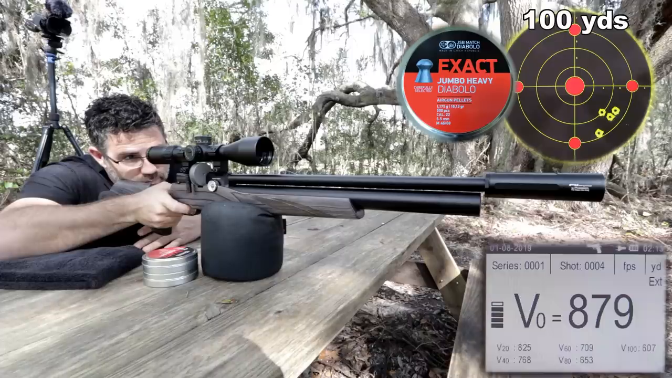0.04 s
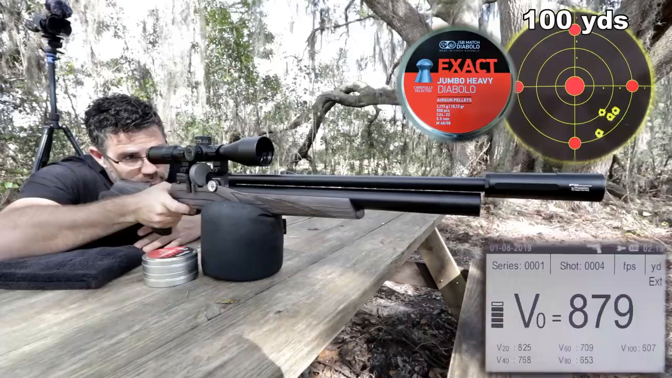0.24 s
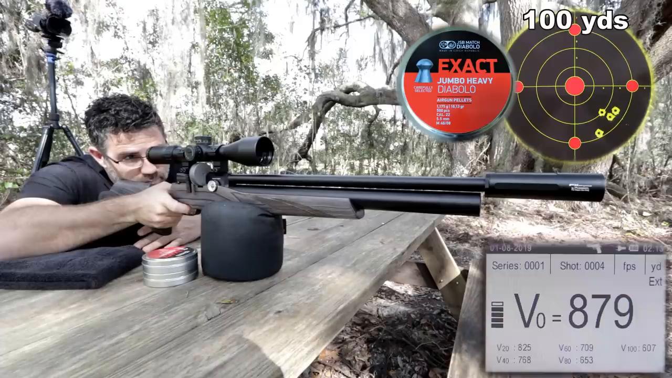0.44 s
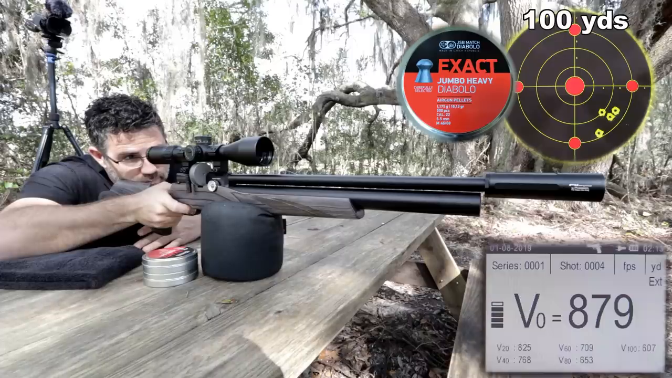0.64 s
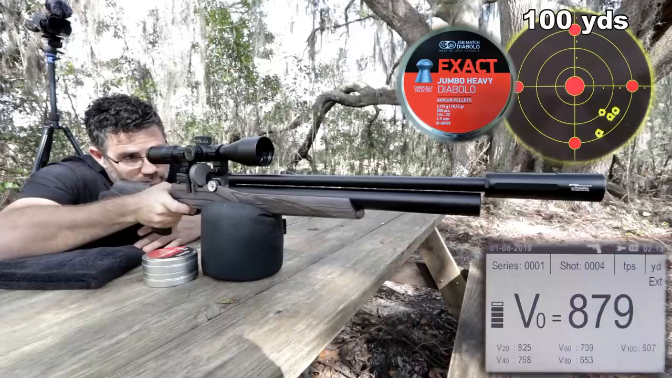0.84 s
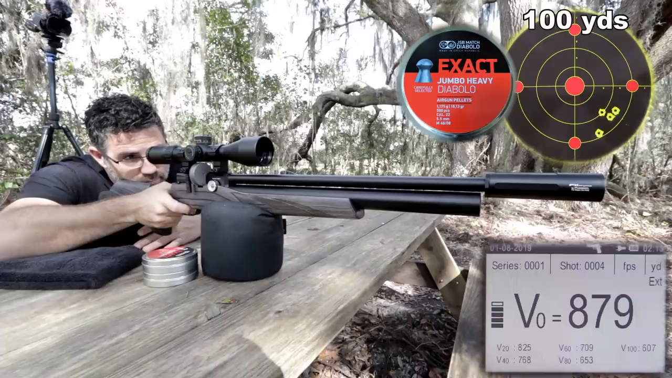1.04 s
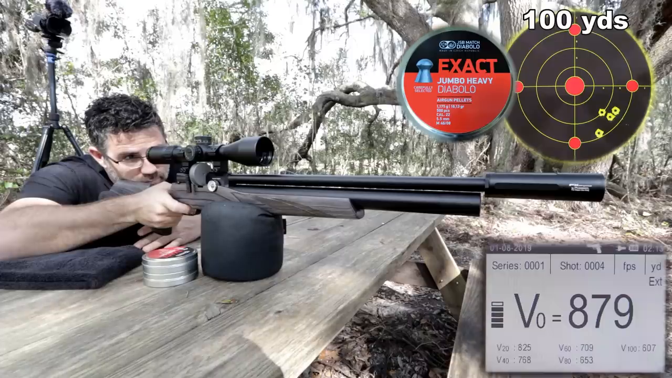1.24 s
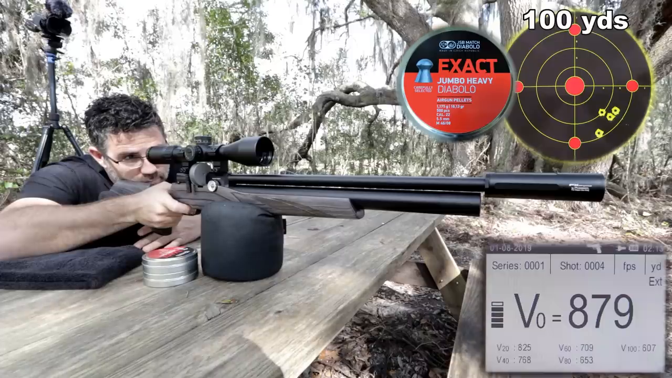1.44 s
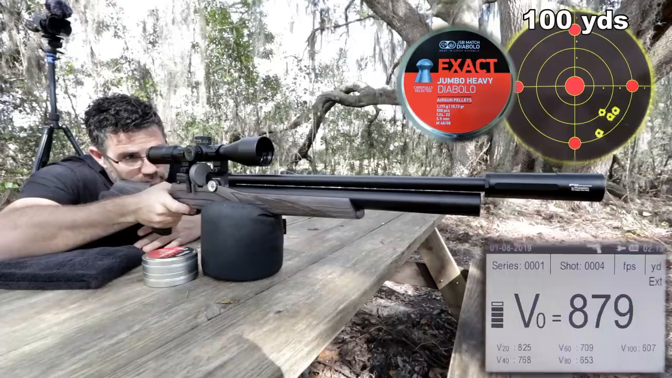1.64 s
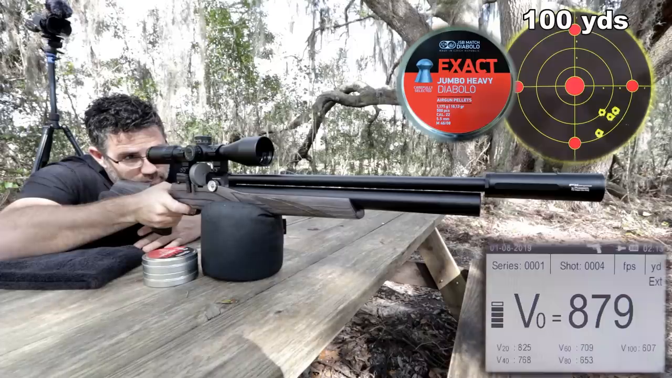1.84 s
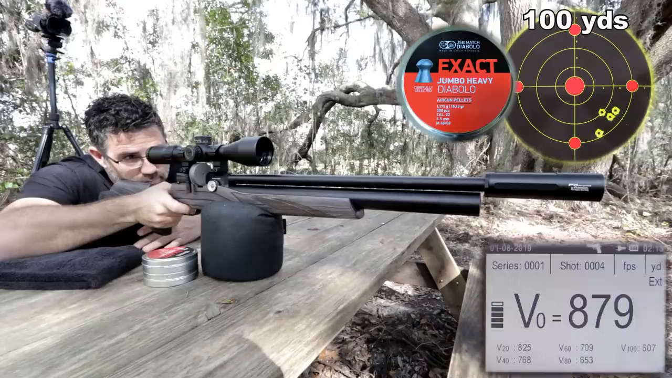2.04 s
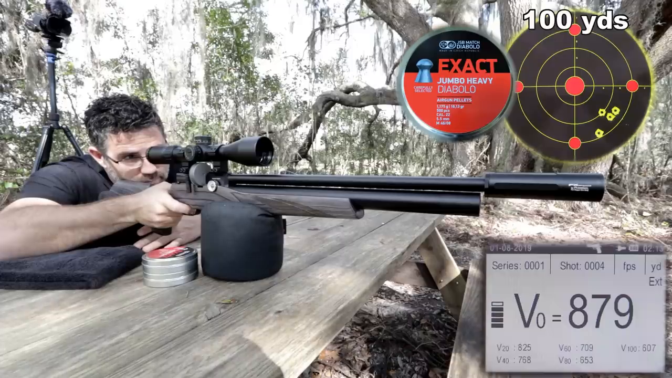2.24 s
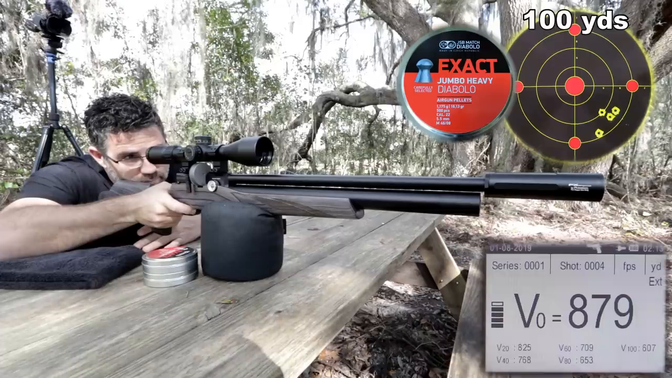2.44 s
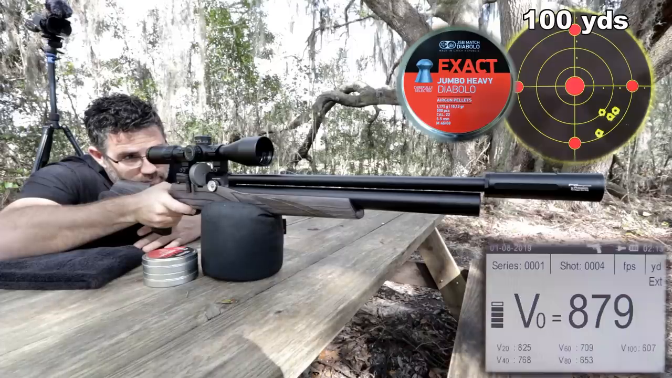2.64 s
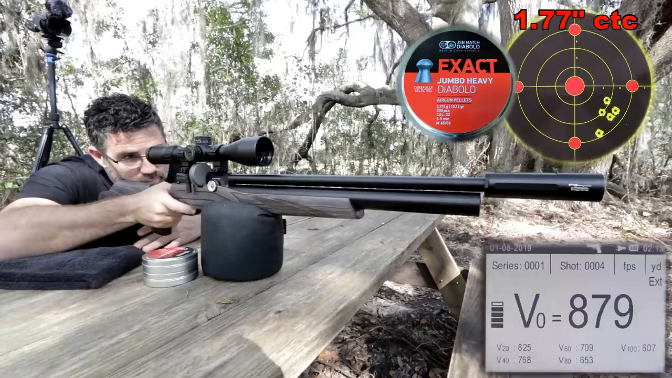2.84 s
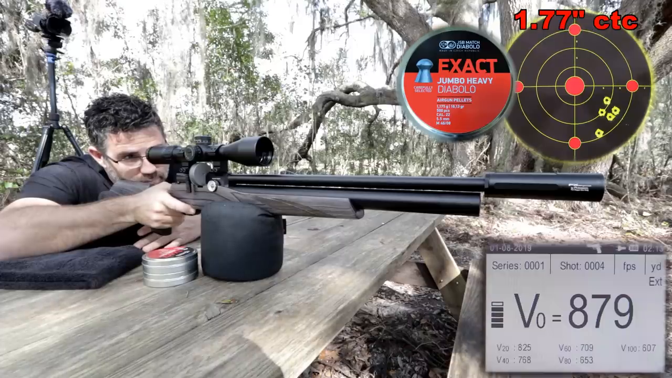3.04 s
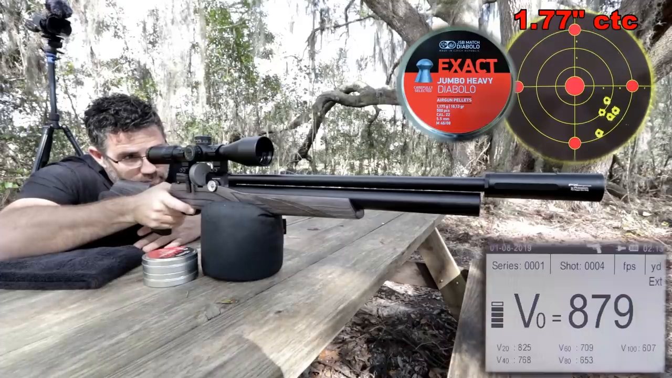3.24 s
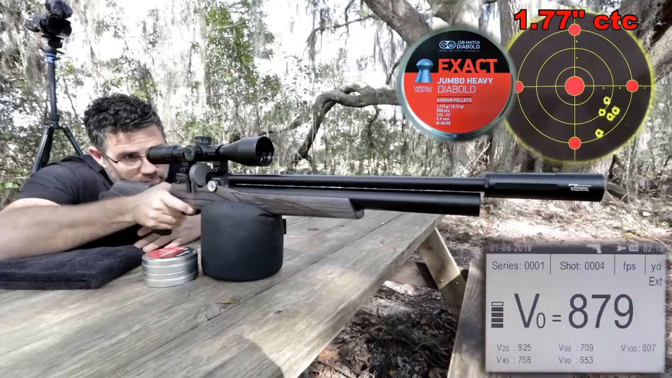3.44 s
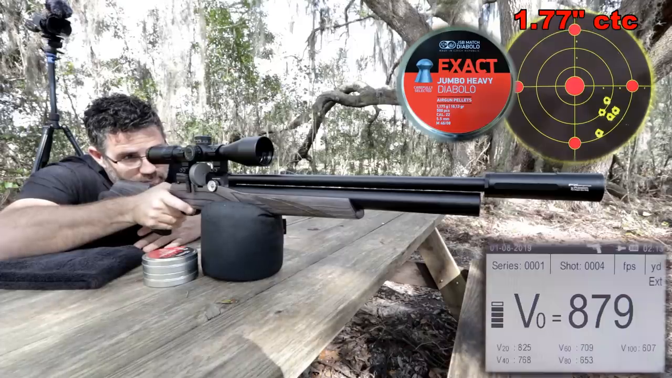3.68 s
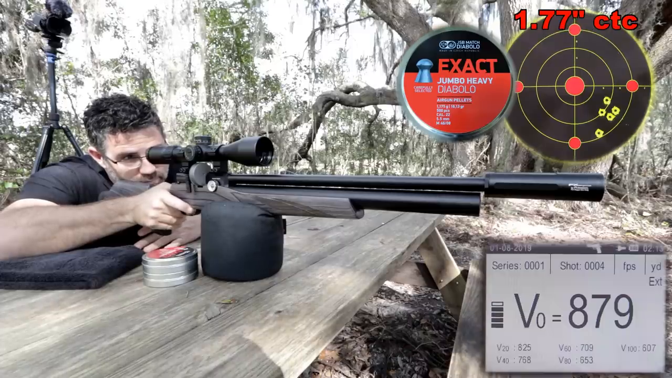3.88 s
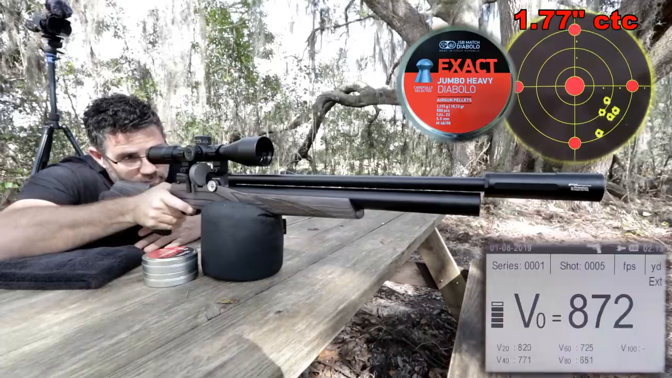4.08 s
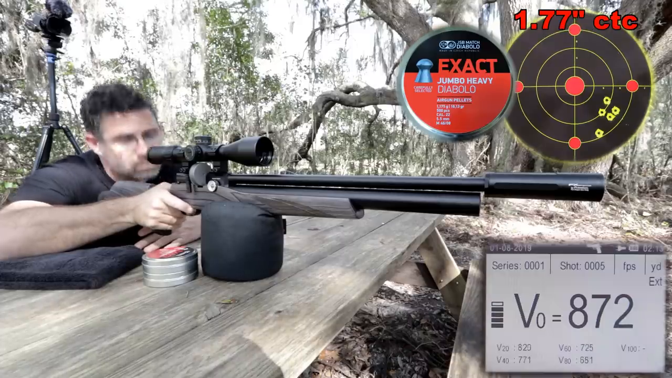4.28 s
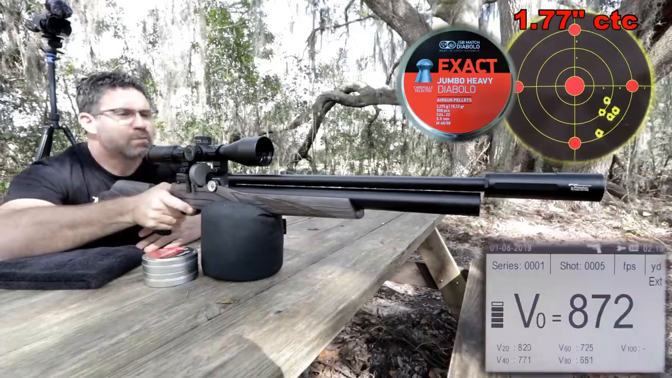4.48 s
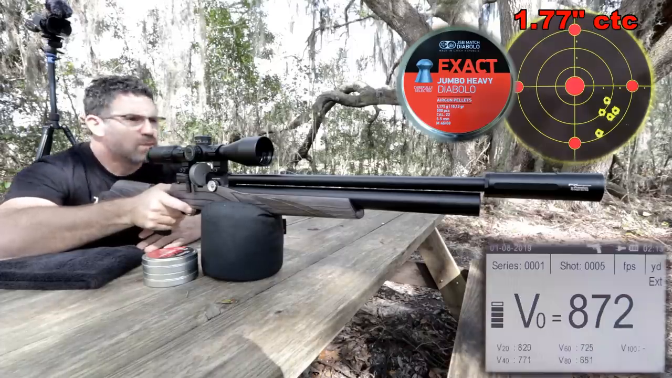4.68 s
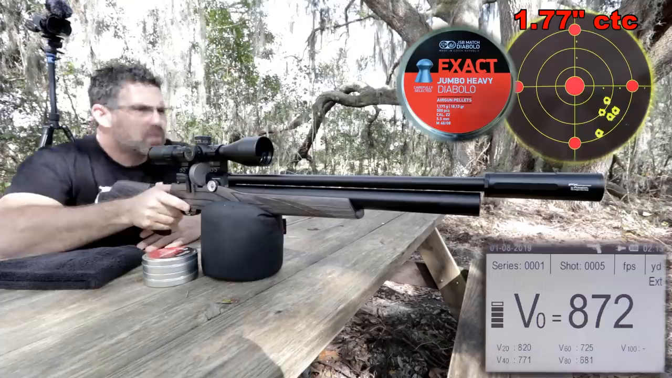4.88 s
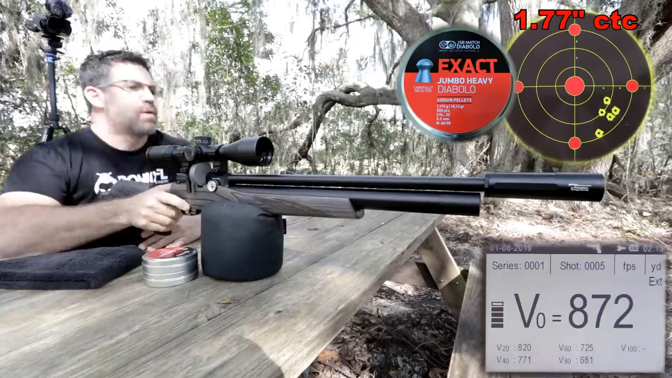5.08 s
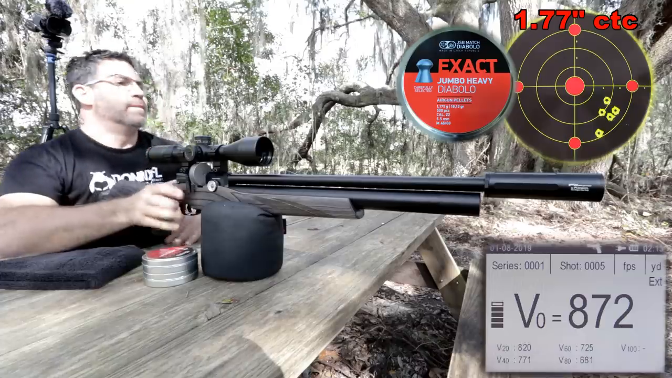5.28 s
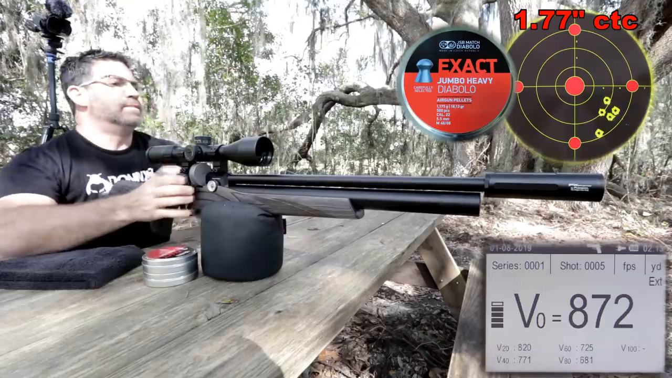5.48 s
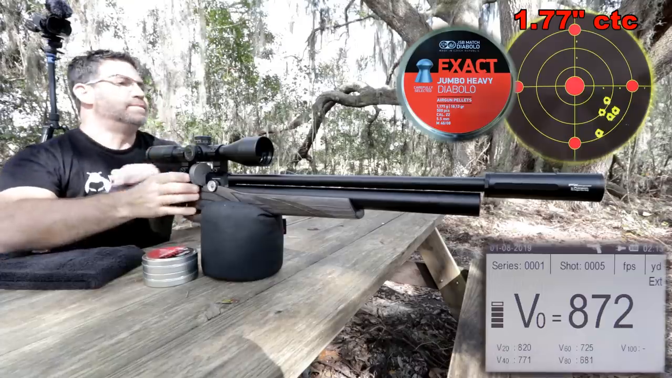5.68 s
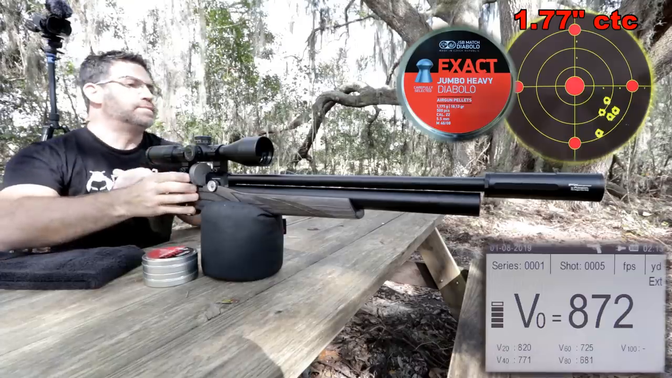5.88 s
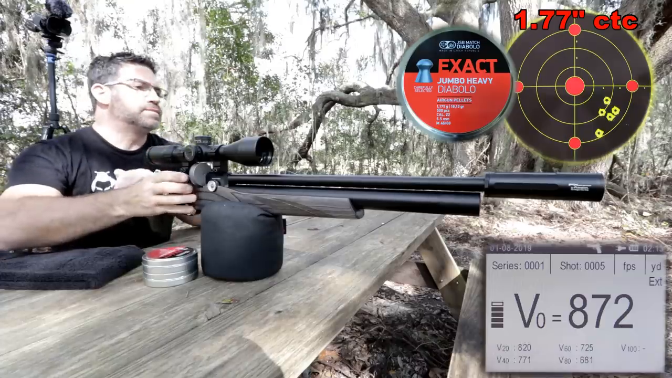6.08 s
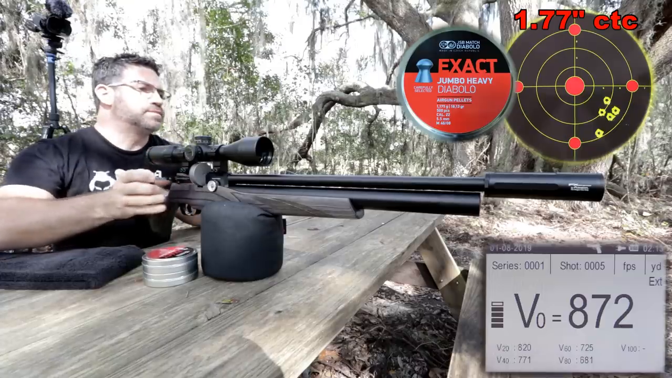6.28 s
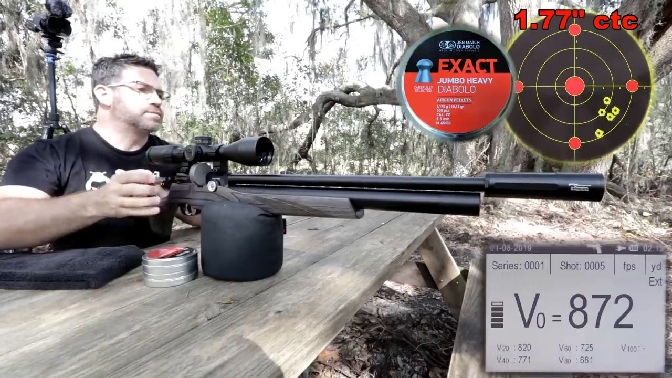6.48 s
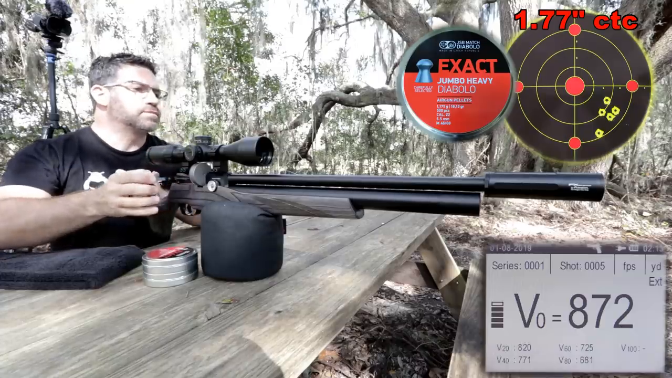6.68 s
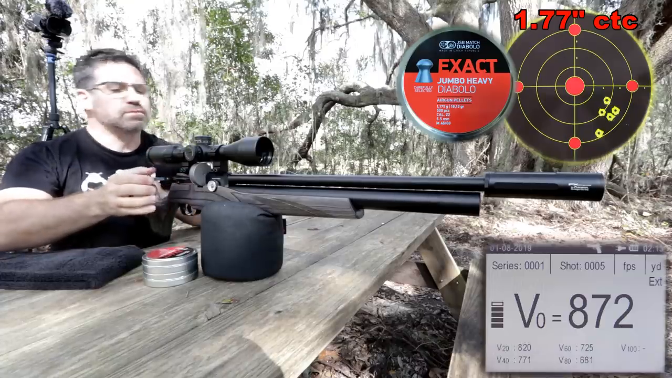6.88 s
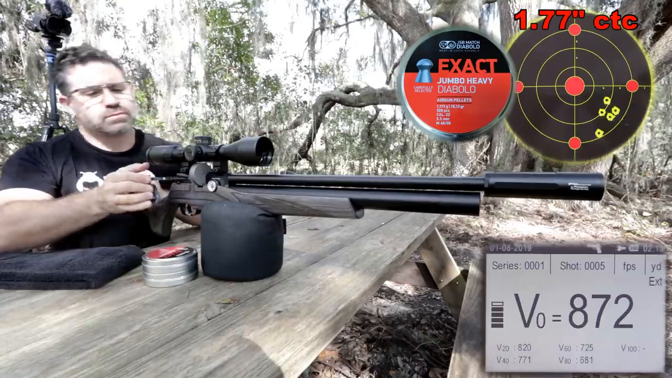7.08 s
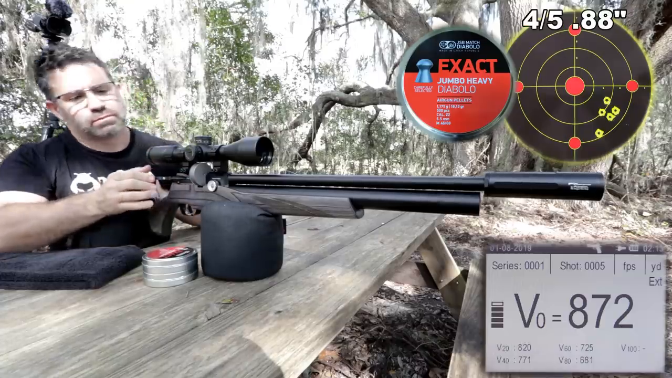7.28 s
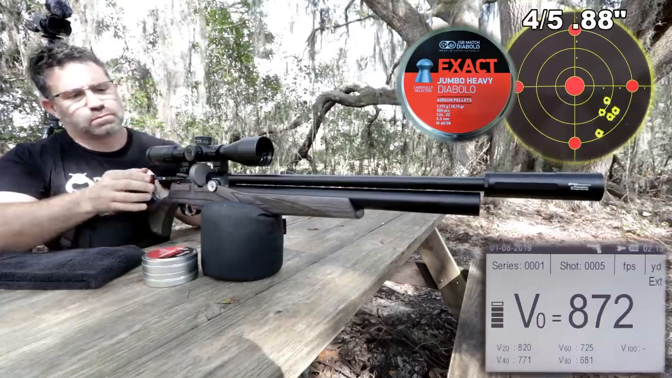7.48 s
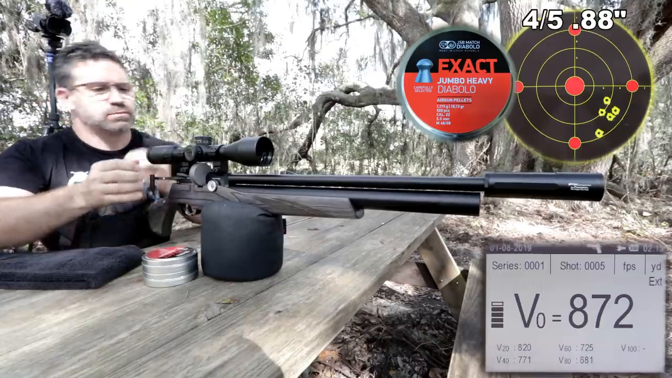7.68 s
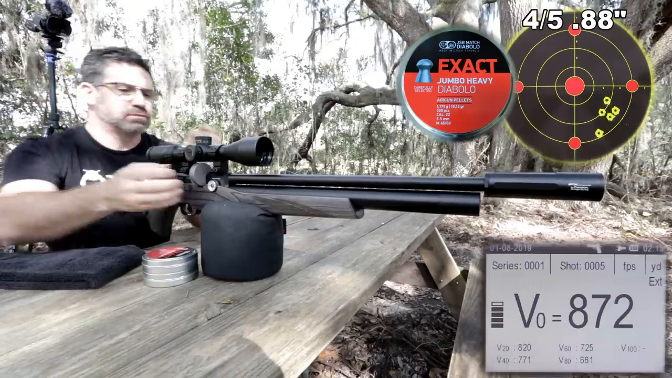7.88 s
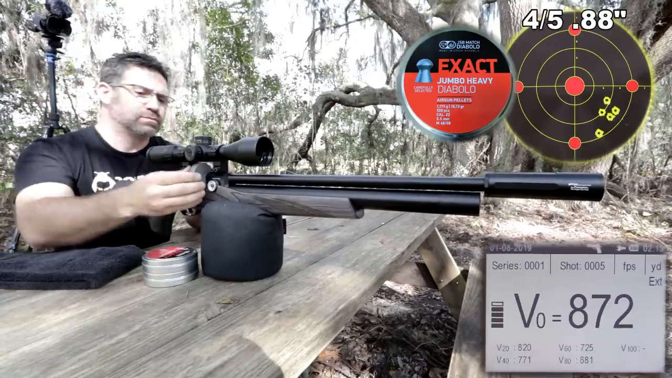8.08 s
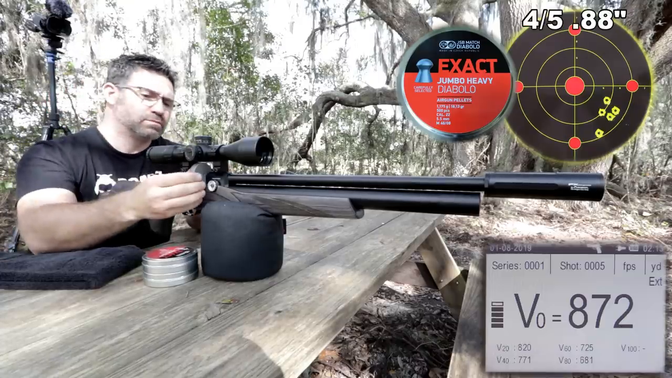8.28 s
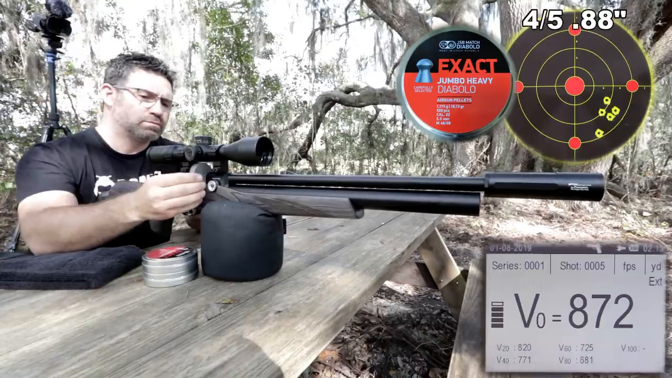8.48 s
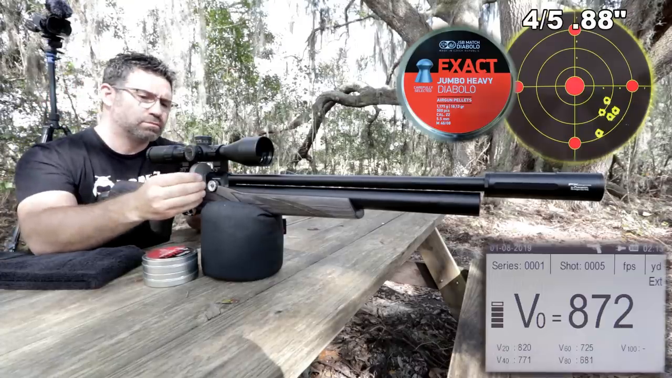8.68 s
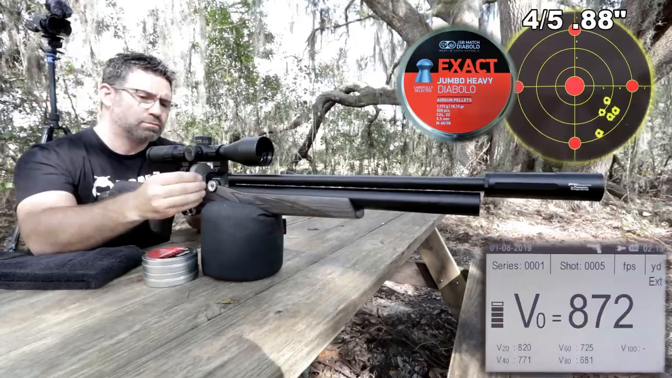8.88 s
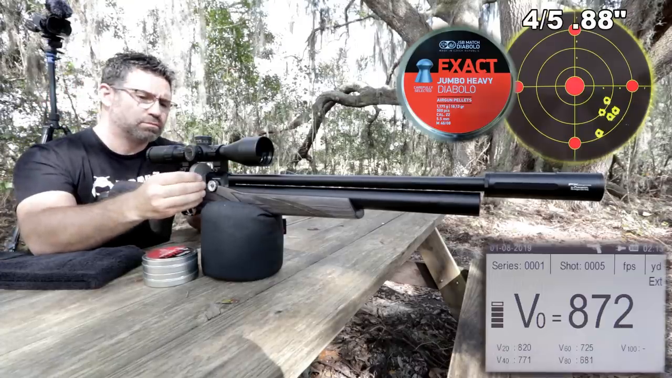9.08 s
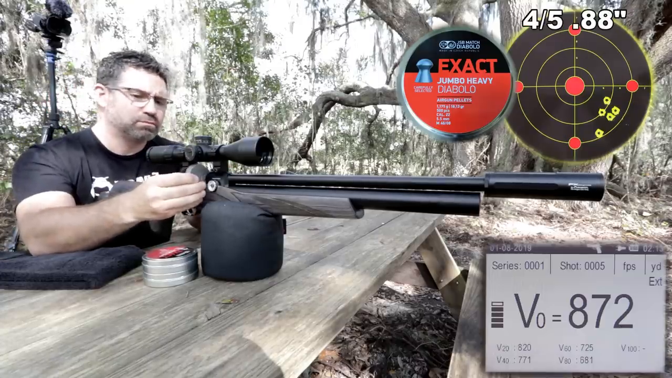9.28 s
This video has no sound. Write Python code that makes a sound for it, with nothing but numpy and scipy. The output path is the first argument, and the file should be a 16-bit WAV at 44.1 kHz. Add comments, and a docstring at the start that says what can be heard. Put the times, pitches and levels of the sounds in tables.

```python
"""A faint engine hum, insect chorus, breeze and the last of a katydid phrase open a scene in the woods.
Far hawks scream and yelp: gliding partials; the katydid is trains of falling whistles. An air rifle fires
from a bench: struck modes for steel and chambers, noise bursts for air. About 0.7 s later, from beside the
target, the pellet hisses in, smacks the board and scatters chips. The shooter sits up with soft rubs of
filtered noise and works the side lever. Random small echoes make the trees."""
import sys
import numpy as np
from scipy import signal
from scipy.fft import irfft, next_fast_len
from scipy.io import wavfile

SR = 44100
rng = np.random.default_rng(int(sys.argv[2]) if len(sys.argv) > 2 else 0)


def waveform_to_disk(signal):
    """Save audio, clipped to [-1, 1], as 16-bit WAV at the path in sys.argv[1]."""
    frames = np.transpose(np.atleast_2d(signal))
    scaled = np.clip(frames, -1, 1) * 32767
    samples = np.round(scaled).astype(np.int16)
    wavfile.write(sys.argv[1], SR, samples)


N = 411453
TIME = np.arange(N) / SR
EDGE_HZ = 15800  # top of the band

# Spectra give only a colour: each noise is brought to one loudness, then placed in the mix.
# still air: (frequency [Hz], relative level [dB])
AIR_COLOUR = [(20, -22), (35, -12), (65, -6), (110, -7), (200, -13), (400, -15.5), (1000, -22.5),
              (2500, -26), (5000, -31.5), (11000, -35), (15500, -36.5)]
# distant insects: (frequency [Hz], relative level [dB])
CHORUS_COLOUR = [(4500, -42.5), (6000, -18.5), (7000, -12), (7600, -3.5), (8250, -1), (8800, -8.5),
                 (9500, -16), (11500, -34.5)]
# engine loudness ahead of a 3 dB lift and flutter: (time [s], level [dB])
HUM_LEVEL = [(0.0, -63), (0.68, -58), (1.66, -58), (2.31, -63), (3.53, -62), (4.68, -76), (5.06, -65),
             (5.51, -62), (6.86, -68), (7.61, -59), (8.96, -65), (9.33, -62)]
# engine overtones against the fundamental: (multiple [ratio], relative level [dB])
HUM_OVERTONES = [(2, -17.5), (4, -25), (5, -25)]
# breeze: (frequency [Hz], relative level [dB])
GUST_COLOUR = [(15, -9.5), (35, 0.5), (60, 0), (100, -8), (250, -25), (1000, -60)]
# puffs of breeze: (start [s], length [s], level [dB])
BREEZE_PUFFS = [(.1, 1.05, -65), (1.55, .95, -64), (2.9, .3, -66), (5.5, .15, -64), (5.9, .2, -70),
                (7.5, .1, -71)]
PUFF_RISE_S, PUFF_FALL_S, CALM_DB = .13, .14, -84
# far vehicle: (frequency [Hz], relative level [dB])
TRAFFIC_COLOUR = [(80, -11.5), (150, -7), (172, 1), (200, -10), (370, -9.5), (600, -19), (1500, -35),
                  (5000, -65)]
CAR_NEAREST_S, CAR_PASS_S, CAR_DB = 6.4, .8, -64.5

# scatter from the trees: (frequency [Hz], relative level [dB])
TREES_COLOUR = [(80, -4), (400, -4), (1000, -5.5), (1900, -3), (3000, -3), (6000, -0.5), (9000, 1),
                (15000, -4)]
# how long the scatter lasts: (frequency [Hz], t60 [s])
TREES_T60 = [(80, .45), (400, .33), (2000, .36), (6000, .36), (10000, 0.25), (15000, 0.42)]
# trees round the target: (frequency [Hz], relative level [dB])
TARGET_TREES_COLOUR = [(80, -6.5), (350, -7.5), (700, -1), (1500, -3.5), (4000, -10), (8000, -0.5),
                       (15000, -9)]
# echo of the far tree line: (frequency [Hz], relative level [dB])
FAR_TREES_COLOUR = [(900, -20), (1500, -4), (2200, -4), (2550, -3), (2900, -10), (3500, -14), (6000, -22)]

# moments where the katydid's phrases stop: (time [s])
KATYDID_STOPS = [.06, .715, 1.255, 1.77, 2.3, 2.83, 3.425, 4.135, 4.705, 5.23, 5.82, 6.425, 7.0, 7.585,
                 8.125, 8.65, 9.185]
STROKES_PER_S, PHRASE_S, PHRASE_SWELL_S = 72.8, .33, .15

# short bird notes, ahead of a 2.5 dB lift: a two-blip peep, then the low closing notes of two hawk yelps:
# (start [s], length [s], frequency [Hz], level [dB])
SHORT_NOTES = [(5.344, 0.02, 2170, -61), (5.364, 0.019, 2230, -58.5), (8.037, 0.036, 1840, -67.5),
               (8.88, 0.033, 1820, -68)]
# long hawk screams, pitches ahead of the shared gesture:
# (start [s], length [s], top pitch [Hz], closing pitch [Hz], level [dB], late lift [Hz], mid-call sag [dB])
HAWK_SCREAMS = [(.44, .25, 2270, 2140, -85, 0, 3), (1.17, .25, 2500, 2150, -83, 0, 0),
                (1.839, .51, 2774, 2440, -66, 0, -3), (2.633, .3, 2825, 2500, -66.5, 0, 7),
                (3.248, .37, 2950, 2390, -61.5, 170, -1), (3.732, .35, 2940, 2425, -69.5, 0, 0),
                (3.822, .34, 3000, 2467, -63.5, 190, 3.5), (4.296, .25, 3016, 2687, -71, 0, 1),
                (4.358, .3, 3000, 2626, -67.5, 0, -4), (4.866, .29, 3135, 2647, -62, 0, 5),
                (5.408, .33, 3100, 2605, -64.5, 0, 1), (6, .375, 3060, 2540, -59.5, 50, 9),
                (6.517, .3, 2910, 2670, -74.5, 0, -1.5), (6.653, .34, 2950, 2470, -70, 0, -4),
                (7.373, .45, 2820, 2420, -74, 0, -2)]
LEAP_S, LEAP_SHARE, SINK_S, DROP_S, DROP_SHARE = .042, .11, .06, .019, .06  # shared pitch gesture
LIFT_LEAD_S, LIFT_WIDTH_S, HALF_PARTIAL_DB = .055, .044, -4.5
# a hoarser hawk: (start [s], level [dB], pitch at the break, sagging afterwards [Hz])
HAWK_YELPS = [(7.9, -61, 2620), (8.445, -68.5, 2600), (8.716, -58.5, 2740), (9.275, -69, 2740)]
YELP_S, BREAK_S, CLIMB_HZ_PER_S, BREAK_TOP_HZ = .2, .045, 16000, 3350
SAG_HZ_PER_S, YELP_FADE_DB_PER_S = 1600, 70

# soft rubs: (frequency [Hz], relative level [dB])
RUB_COLOUR = [(150, -18.5), (400, 3), (850, -5), (1400, -3), (2500, -7), (5000, -14), (10000, -23.5),
              (15000, -48)]
# soft rubs: shirt and sleeves as the shooter moves, and the lever sliding near 6.4 s:
# (start [s], length [s], level [dB])
SOFT_RUBS = [(4.27, .03, -66), (4.52, .17, -64.5), (4.88, .1, -68), (5.03, .26, -61), (5.44, .2, -63),
             (5.7, .1, -68), (6.39, .08, -62), (7.1, .1, -67), (7.24, .04, -58)]
RUB_RISE_S, RUB_FALL_S = .05, .05
# bench wood: (frequency [Hz], relative level [dB])
PLANK_COLOUR = [(250, -20), (550, -11), (690, -3), (790, -2.5), (930, -0.5), (1150, -6.5), (1550, -7.5),
                (2300, -15), (4300, -20.5), (5300, -22), (6500, -29), (15000, -37)]
# forearm sliding back over the bench: (start [s], length [s], level [dB])
FOREARM_SWEEP = (5.04, .18, -55.5)
# small ticks and knocks of hands, stock and bench: (time [s], level [dB], frequency [Hz], t60 [s])
HAND_KNOCKS = [(.255, -62.5, 4600, .03), (4.655, -50, 480, .04), (5.417, -45.5, 395, .025),
               (7.438, -49, 600, .04), (7.48, -46.5, 98.8, .15), (7.508, -50.5, 1395, 0.026),
               (7.556, -50, 2750, 0.018), (7.658, -49, 2250, 0.021)]

# dry leaves: (frequency [Hz], relative level [dB])
LEAVES_COLOUR = [(200, -24), (800, -6.5), (1400, -1), (2200, -2), (4000, -4.5), (7000, -13), (14000, -32)]
# crumbs on dry leaves, fine dust first: (start [s], length [s], level [dB], fall [s], density [crumbs/s])
CRUMB_SHOWERS = [(2.978, .015, -50, .04, 4000), (3.07, .11, -65, .17, 300)]
# largest chips landing behind the target: (time [s], level [dB], frequency [Hz], t60 [s])
FALLING_CHIPS = [(2.957, -29.5, 660, 0.019), (3.048, -36, 670, .022), (3.082, -42.5, 680, 0.044),
                 (3.147, -41.5, 3633, 0.017)]
# hiss round the pellet: (frequency [Hz], relative level [dB])
WAKE_COLOUR = [(100, -5.5), (800, -9), (2000, 0.5), (4500, -0.5), (9000, -2.5), (14000, -6), (16000, -16.5)]
PASS_S, HIT_S, HISS_LEAD_S = 2.8915, 2.9062, .072  # passes, then strikes; the hiss carries this far ahead
PELLET_M_PER_S, MISS_M, WAKE_DB, TRAIL_DB, TRAIL_FALL_S = 200, .35, -30, -54.5, .04
REPORT_S, REPORT_DB, REPORT_T60_S = 2.7595, -58, .22  # the muzzle report beats the pellet to the target
# target board modes: (frequency [Hz], relative level [dB], t60 [s])
BOARD_MODES = [(130.8, -33, 0.046), (529, -6.5, 0.015), (1480, 0.5, 0.012), (2283, -7.5, 0.024),
               (3420, 1, 0.011), (4340, 1.5, .013)]
# smack on the board: (frequency [Hz], relative level [dB])
SMACK_COLOUR = [(80, -12), (600, 0.5), (1400, 2), (4200, 0.5), (6000, -7.5), (9000, -13.5), (15000, -24.5)]

# moderator chambers: (frequency [Hz], relative level [dB], t60 [s])
MUZZLE_MODES = [(268, -13, .05), (624, -8, .03), (830, -5, 0.0077), (1130, -7, .028), (1580, -5, .024),
                (2033, -0.5, 0.016)]
# escaping air: (frequency [Hz], relative level [dB])
JET_COLOUR = [(30, -35.5), (90, -8.5), (240, 1), (380, -0.5), (480, -7.5), (620, -2.5), (820, -6.5),
              (1400, 0), (2200, -3), (2700, -4), (3600, -2), (5000, -3.5), (8200, -1), (15500, -17)]
# the rifle's steel parts: (frequency [Hz], relative level [dB], t60 [s])
STEEL_MODES = [(1050, -2.5, 0.11), (1814, -2.5, 0.12), (2030, -3, .1), (3300, -6.5, .08),
               (5140, -5.5, 0.092), (7060, -4, .1), (7617, -3.5, .16), (8800, -3, .14), (8460, -0.5, .12),
               (9243, 0, .11)]
# hammer spring and air tube: (frequency [Hz], relative level [dB], t60 [s])
SPRING_MODES = [(251.7, 15.5, .45), (355, 13, .45), (599.4, 9.5, .45), (1866.6, 0, .45), (3112, -6.5, 1.5),
                (5749, -8.5, .9), (10060, -5.5, 1.7), (11890, -11, 1.3), (13320, -9.5, 1.6)]
# hammer and lever blows: (time [s], level [dB], t60 of the crack [s], brightness [dB/octave])
ACTION_BLOWS = [(2.209, -27, .03, -2), (6.447, -30, .013, -2), (6.4577, -40, .05, -2),
                (6.4623, -34, .014, -4.5), (7.226, -52, .027, -1.5), (7.2534, -35, .041, -7),
                (7.2705, -37, .07, -6), (7.2792, 3.3, .013, 1.9), (7.2996, -10.5, .038, -1.4)]
# crack of a blow: (frequency [Hz], relative level [dB])
CRACK_COLOUR = [(40, -45), (180, -28.5), (420, -10), (780, -10.5), (1050, -1), (1400, -9), (2050, 3),
                (2850, -8.5), (3500, -3.5), (5800, -8), (7800, -1), (10000, -12), (15000, -25)]
STOCK_HZ, STOCK_T60_S, STOCK_LOUDEST_DB = 1120, .023, -33  # every blow knocks the stock
STEEL_RING_DB = -34.5  # and rings the steel, set against its crack
RATTLE_DELAY_S, RATTLE_DB, RATTLE_T60_S = .016, -29.5, .06  # the lever shivers after it latches


def amp(db):
    """Decibels to gain."""
    return 10 ** (np.asarray(db) / 20)


def unit(x):
    """Scales to rms 1."""
    return x / np.sqrt(np.mean(x ** 2) + 1e-20)


def read(points, hz):
    """Reads a curve along a log-frequency axis."""
    f, value = np.transpose(points)
    return np.interp(np.log(hz + 1), np.log(f), value)


def follow(rows):
    """The gain curve of (time [s], level [dB]) rows."""
    s, db = np.transpose(rows)
    return amp(np.interp(TIME, s, db))


def add(mix, s, sound):
    """Mixes a sound in at time s."""
    start = round(s * SR)
    sound = sound[max(-start, 0):]
    part = mix[max(start, 0):][:len(sound)]
    part += sound[:len(part)]


def noise(spectrum, size, tilt_db=0):
    """Noise of rms 1 with a given spectrum, tilted per octave about 1 kHz."""
    count = next_fast_len(size)
    hz = np.fft.rfftfreq(count, 1 / SR)
    octaves = np.log2(np.maximum(hz, 200) / 1000)  # the tilt levels off below 200 Hz
    gain = amp(read(spectrum, hz) + tilt_db * octaves)
    phases = np.exp(2j * np.pi * rng.random(len(hz)))
    return unit(irfft(gain * phases, count)[:size])


def wander(size, per_s):
    """Glides straight between random points of mean 0 and spread 1, per_s of them a second."""
    at = np.arange(size) * per_s / SR
    return np.interp(at, np.arange(4096), rng.standard_normal(4096))


def fade(t60, size):
    """Exponential decay, 60 dB in t60 seconds."""
    return np.exp(-np.log(1000) * np.arange(size) / SR / t60)


def ring(modes, size=SR // 2):
    """Struck modes in alternating polarity, each dying at its own rate."""
    t = np.arange(size) / SR
    out = np.zeros(size)
    for k, (hz, db, t60) in enumerate(modes):
        out += (-1) ** k * amp(db) * fade(t60, size) * np.sin(2 * np.pi * hz * t)
    return out


def burst(spectrum, t60, tilt_db=0):
    """A sudden puff of noise that dies away, at most 93 ms long."""
    return noise(spectrum, size=4096, tilt_db=tilt_db) * fade(t60, size=4096)


def swell(start, length, db, rise_s, fall_s):
    """A gain that rises towards start, holds for length, and dies away."""
    before = np.maximum(start - TIME, 0)
    after = np.maximum(TIME - start - length, 0)
    return amp(db) * np.exp(-before / rise_s - after / fall_s)


def swells(rows, rise_s, fall_s):
    """Several swells of one shape, added in power."""
    return np.sqrt(sum(swell(*row, rise_s, fall_s) ** 2 for row in rows))


def radiate(x, corner_hz):
    """Small things push out little deep bass."""
    return signal.sosfilt(signal.butter(2, corner_hz, "highpass", fs=SR, output="sos"), x)


def woods(x, colour, build_s):
    """Many small echoes from trunks and ground, building up and then dying band by band."""
    echoes = rng.standard_normal(SR) * (rng.random(SR) < .15)
    hz, t, bands = signal.stft(echoes, SR, nperseg=256)
    decay = np.exp(-np.log(1000) * t / read(TREES_T60, hz)[:, None])
    bands = bands * amp(read(colour, hz))[:, None] * decay
    build = 1 - np.exp(-(np.arange(SR) / SR / build_s) ** 2)
    tail = signal.istft(bands, SR, nperseg=256)[1][:SR] * build
    return signal.fftconvolve(x, tail / np.linalg.norm(tail))[:N]


def taps(rows):
    """Small blunt contacts: one short resonance and a puff around it."""
    out = np.zeros(N)
    for s, db, hz, t60 in rows:
        puff_colour = [(hz / 4, -14), (hz, 0), (hz * 2, -12), (hz * 4, -32), (hz * 16, -65)]
        puff = burst(puff_colour, t60)
        add(out, s, amp(db) * (0.74 * ring([(hz, 0, t60)], size=4096) + .5 * puff))
    return out


def still_air():
    """Steady, faint, bass-heavy noise of open air."""
    return amp(-68) * noise(AIR_COLOUR, N)


def insect_chorus():
    """Many far insects blur into a narrow, slightly unsteady band of treble."""
    return amp(-70.0 + .5 * wander(N, per_s=11)) * noise(CHORUS_COLOUR, N)


def breeze():
    """Deep wind noise swells in puffs above a calm floor."""
    return (amp(CALM_DB) + swells(BREEZE_PUFFS, PUFF_RISE_S, PUFF_FALL_S)) * noise(GUST_COLOUR, N)


def far_vehicle():
    """A passing rumble whose level follows one over its distance."""
    distance = np.hypot(1, (TIME - CAR_NEAREST_S) / CAR_PASS_S)  # 1 at its nearest
    return amp(CAR_DB) / distance * noise(TRAFFIC_COLOUR, N)


def engine(hum_hz=76.9):
    """A distant engine's low tone and overtones share one unsteady pitch."""
    turns = np.cumsum(hum_hz * (1 + .012 * wander(N, per_s=12))) / SR
    hum = np.sin(2 * np.pi * turns)
    for multiple, db in HUM_OVERTONES:
        hum += amp(db) * np.sin(2 * np.pi * round(multiple) * turns)
    return hum * follow(HUM_LEVEL) * amp(3 + 1.3 * wander(N, per_s=12))


def katydid(top_hz=8650, fall_hz=1500, duty=0.55):
    """Each wing stroke is a falling whistle; a phrase starts soft and low, swells, and stops dead."""
    out = np.zeros(N)
    t = np.arange(0, PHRASE_S, 1 / SR)
    stroke = np.minimum((t - t[-1]) * STROKES_PER_S % 1 / duty, 1)
    effort = np.minimum(t / PHRASE_SWELL_S, 1)
    for end in KATYDID_STOPS:
        hz = top_hz - fall_hz * stroke ** 1.2 - 650 * (1 - effort) + 70 * wander(len(t), per_s=2000)
        level_db = -56.0 - 12.5 * (1 - effort) + .7 * wander(len(t), per_s=70)
        press = np.sin(np.pi * stroke ** .7) * amp(level_db)
        add(out, end - PHRASE_S, press * np.sin(2 * np.pi * np.cumsum(hz) / SR))
    return out + amp(-16) * woods(out, TREES_COLOUR, build_s=.01)


def short_notes():
    """A two-blip peep and the low closing notes of two hawk yelps: steady sines under a rounded swell."""
    out = np.zeros(N)
    for s, length, hz, db in SHORT_NOTES:
        t = np.arange(0, length, 1 / SR)
        add(out, s, amp(db + 2.5) * np.sin(np.pi * t / length) * np.sin(2 * np.pi * hz * t))
    return out + amp(-11) * woods(out, TREES_COLOUR, build_s=.02)


def cry(hz, partials, rough):
    """A hawk's voice: partials (ratio to hz, level [dB]) share one roughened pitch."""
    jitter = rough * wander(len(hz), per_s=420) + .004 * wander(len(hz), per_s=53)
    turns = np.cumsum(hz * (1 + jitter)) / SR
    return np.sqrt(2) * sum(amp(db) * np.sin(2 * np.pi * ratio * turns) for ratio, db in partials)


def screams():
    """Each scream leaps up, sinks slowly, may lift once more, and drops off at the end."""
    out = np.zeros(N)
    for s, length, top_hz, end_hz, db, lift_hz, sag_db in HAWK_SCREAMS:
        t = np.arange(0, length, 1 / SR)
        since_top = np.maximum(t - LEAP_S, 0)
        height = 0.63 * np.exp(-since_top / SINK_S) + .45 * (1 - since_top / (length - LEAP_S))
        leap = 1 - LEAP_SHARE * np.maximum(1 - t / 0.052, 0) ** 2
        lift = lift_hz * np.exp(-((length - t - LIFT_LEAD_S) / LIFT_WIDTH_S) ** 2)
        drop = 1 - DROP_SHARE * np.exp((t - length) / DROP_S)
        hz = (end_hz + (top_hz - end_hz) * height + lift) * leap * drop
        strain_db = 10 * (height - 1)  # the lower partials sound most at the top of the call
        partials = [(1 / 2, HALF_PARTIAL_DB + .7 * strain_db), (3 / 4, -14 + 4 * strain_db),
                    (1, -2 * height), (3 / 2, -30)]
        sag = sag_db * np.exp(-((t / length - .55) / .19) ** 2)  # a negative sag is a bulge
        loudness = amp(db - sag + 1.8 * wander(len(t), per_s=25)) * signal.windows.tukey(len(t), .14)
        add(out, s, loudness * cry(hz, partials, rough=.007))
    return out + amp(-11) * woods(out, TREES_COLOUR, build_s=.02)


def yelps():
    """Short hoarse calls climb, break downwards and fade; the far tree line returns them twice."""
    out = np.zeros(N)
    t = np.arange(0, YELP_S, 1 / SR)
    since_break = t - BREAK_S
    broken = .5 + .5 * np.tanh(since_break / .008)  # the two registers overlap for a moment
    upper = [(3 / 4, -22), (1, 0), (5 / 4, -23), (3 / 2, -17), (2, -24)]
    climb_hz = BREAK_TOP_HZ - CLIMB_HZ_PER_S * abs(since_break)
    for s, db, broken_hz in HAWK_YELPS:
        climb = cry(climb_hz, [(1 / 2, -4)] + upper, rough=.022)
        sink = cry(broken_hz - SAG_HZ_PER_S * since_break, [(1 / 2, -11)] + upper, rough=.022)
        voice = amp(-3.5) * np.sqrt(1 - broken) * climb
        voice += amp(2.5 - YELP_FADE_DB_PER_S * since_break) * np.sqrt(broken) * sink
        loudness = amp(db + 2.8 * wander(len(t), per_s=92.6)) * signal.windows.tukey(len(t), .2)
        add(out, s, voice * loudness)
    far = woods(out, FAR_TREES_COLOUR, build_s=0.033)
    out = amp(-2) * out + amp(-6) * woods(out, TREES_COLOUR, build_s=0.018)
    for delay_s, db in [(.15, -24.5), (.33, -30)]:
        add(out, delay_s, amp(db) * far)
    return out


def shooter():
    """Shirt, sleeves and the sliding lever rub softly, a forearm drags over wood, and hands knock."""
    rubs = noise(RUB_COLOUR, N) * swells(SOFT_RUBS, RUB_RISE_S, RUB_FALL_S)
    forearm = noise(PLANK_COLOUR, N) * swell(*FOREARM_SWEEP, rise_s=.045, fall_s=.11)
    return (rubs + forearm) * amp(1.3 * wander(N, per_s=94)) + taps(HAND_KNOCKS)


def debris(tick_t60=.008):
    """Crumbs shower on dry leaves: noise gated by tiny random ticks of uneven size."""
    power = np.zeros(N)
    for start, length, db, fall_s, crumbs_per_s in CRUMB_SHOWERS:
        crumbs = rng.exponential(1, N) * (rng.random(N) < crumbs_per_s / SR)
        ticks = abs(signal.oaconvolve(crumbs, fade(tick_t60, size=1024) ** 2)[:N])
        power += ticks / ticks.mean() * swell(start, length, db, rise_s=.014, fall_s=fall_s) ** 2
    return noise(LEAVES_COLOUR, N) * np.sqrt(power)


def wake():
    """The pellet's hiss grows as one over its distance and ends at the board; stirred air trails it."""
    distance_m = np.hypot(MISS_M, PELLET_M_PER_S * (TIME - PASS_S))
    flight = (PASS_S - HISS_LEAD_S, HIT_S - PASS_S + HISS_LEAD_S)  # start, length
    near = swell(*flight, WAKE_DB, rise_s=.008, fall_s=.004) * MISS_M / distance_m
    trail = swell(*flight, TRAIL_DB, rise_s=.008, fall_s=TRAIL_FALL_S)
    return noise(WAKE_COLOUR, N) * np.hypot(near, trail)


def pellet():
    """The far report arrives first; the pellet pushes air as it passes, then breaks face and backing."""
    smack, board = np.zeros((2, N))
    report = taps([(REPORT_S, -44.5, 280, .029)])
    add(report, REPORT_S, amp(REPORT_DB) * burst(JET_COLOUR, REPORT_T60_S, tilt_db=-1.5))
    add(board, 2.8905, amp(-21) * ring([(210, 0.0018, .016)]))  # the push of air
    for delay_s, db in [(0, 0), (.0015, -1.8)]:  # face, then backing
        add(board, HIT_S + delay_s, amp(db - 8.5) * ring(BOARD_MODES))
        add(smack, HIT_S + delay_s, amp(db - 1) * burst(SMACK_COLOUR, t60=.008))
    echoes = amp(-26) * woods(smack, TARGET_TREES_COLOUR, build_s=0.015)
    return report + wake() + smack + board + echoes + taps(FALLING_CHIPS)


def muzzle():
    """The chambers pop, air jets out ahead of and behind the pop, and the steel rings."""
    shot = np.zeros(N)
    add(shot, 2.213, amp(2) * ring(MUZZLE_MODES))
    add(shot, 2.2126, amp(-16) * burst(JET_COLOUR, t60=.05))
    add(shot, 2.2159, amp(2.5) * burst(JET_COLOUR, t60=.045))  # the main jet, behind the pellet
    add(shot, 2.2159, amp(-24) * ring(STEEL_MODES))
    return shot


def hammer_and_lever():
    """Each blow is a crack of noise that rings the steel and knocks the stock."""
    action = np.zeros(N)
    for s, db, t60, tilt_db in ACTION_BLOWS:
        add(action, s, amp(db) * burst(CRACK_COLOUR, t60, tilt_db))
        add(action, s, amp(db + STEEL_RING_DB) * ring(STEEL_MODES))
        action += taps([(s, min(db - 2, STOCK_LOUDEST_DB), STOCK_HZ, STOCK_T60_S)])
    latch_s = ACTION_BLOWS[-1][0]
    rattle = amp(RATTLE_DB) * burst(CRACK_COLOUR, RATTLE_T60_S, tilt_db=-2.5)
    add(action, latch_s + RATTLE_DELAY_S, rattle)
    return radiate(action, corner_hz=410)


def rifle():
    """Muzzle and action echo off the trees; hammer spring and air tube sing on after the shot."""
    shot, action = muzzle(), hammer_and_lever()
    echoes = woods(amp(-22) * shot + amp(-26.5) * action, TREES_COLOUR, build_s=.008)
    # the window eases the singing in and closes it within half a second
    add(shot, 2.2159, amp(-59) * ring(SPRING_MODES) * signal.windows.tukey(SR // 2, .3))
    return shot + action + echoes


def scene():
    """Everything, in one channel."""
    background = still_air() + insect_chorus() + breeze() + far_vehicle() + engine()
    wildlife = katydid() + short_notes() + screams() + yelps()
    blows = radiate(rifle() + pellet(), corner_hz=110.6)
    return (background + wildlife + shooter() + debris() + blows)[None]


def record(dry):
    """The loudest blows flatten at full scale; then a steep low-pass closes the top of the band."""
    clipped = np.clip(dry, -1, 1)
    lowpass = signal.firwin(511, EDGE_HZ, window=("kaiser", 9), fs=SR)[None]
    return signal.oaconvolve(clipped, lowpass, "same")


dry = scene()
out = record(dry)
waveform_to_disk(out)
```